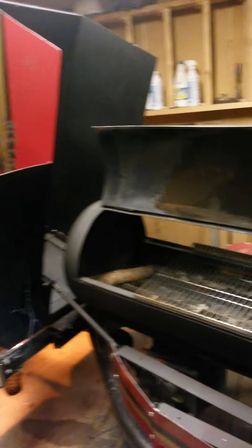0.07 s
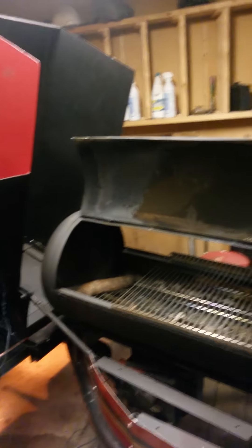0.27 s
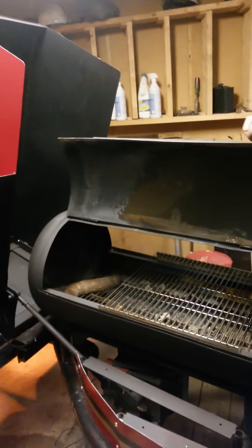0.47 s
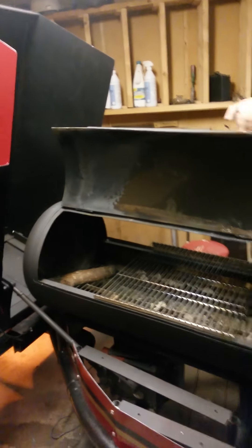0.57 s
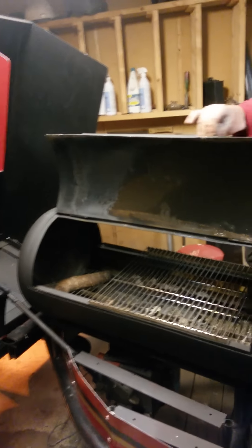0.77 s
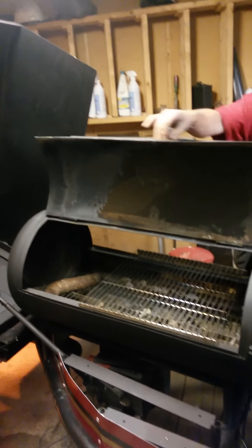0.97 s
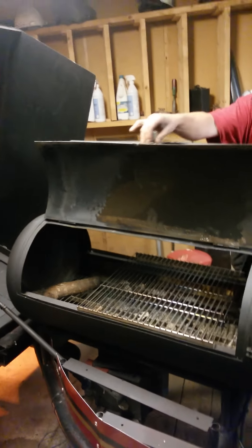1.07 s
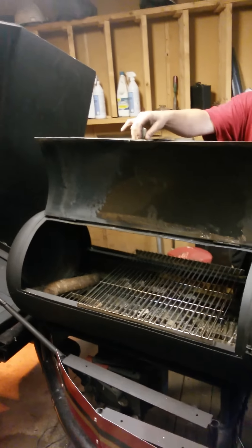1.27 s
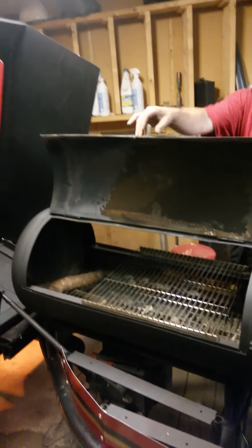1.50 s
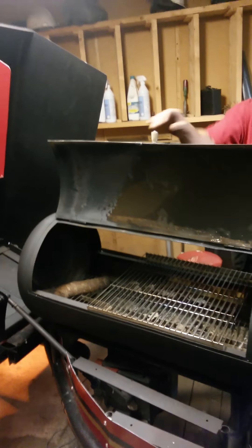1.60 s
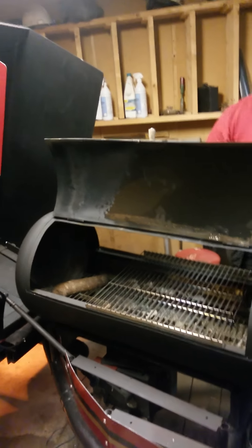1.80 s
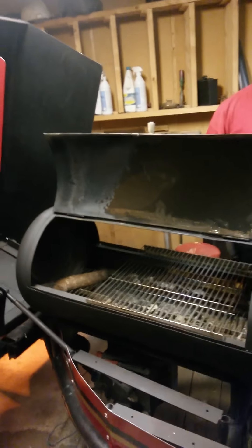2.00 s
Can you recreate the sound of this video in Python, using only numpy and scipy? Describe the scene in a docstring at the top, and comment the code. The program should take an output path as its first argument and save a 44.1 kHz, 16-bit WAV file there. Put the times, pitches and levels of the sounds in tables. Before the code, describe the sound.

Something abrasive rasps loudly over a metal barbecue barrel, three short strokes then a long one.

```python
"""Scouring a barrel barbecue

A hand rubs something abrasive over sheet steel in a workshop: three short strokes, then a long one.
Dense grit catches and slips, ringing the panels and the barrel, with a brief squeal here and there.
The room carries the ring away over a faint hum. The left is dull above 6 kHz, the right is bright."""
import sys
import numpy as np
from scipy import signal
from scipy.fft import rfft, irfft
from scipy.io import wavfile

SR = 44100
rng = np.random.default_rng(int(sys.argv[2]) if len(sys.argv) > 2 else 0)


def unload_audio(sound):
    """Save the sound as a 16-bit wav file, at the path given as the first command line argument."""
    columns = np.transpose(np.atleast_2d(sound))
    # keep every value between -1 and 1, then stretch to whole-number steps
    steps = np.round(np.clip(columns, -1, 1) * 32767)
    wavfile.write(sys.argv[1], SR, steps.astype(np.int16))


N = 90404
T = np.arange(N) / SR
HZ = np.arange(N // 2 + 1) * SR / N + 1e-3
ALIKE_HZ = 740  # below this both microphones hear nearly the same


def undb(db):
    """Decibels to gain."""
    return np.exp(np.asarray(db) * (np.log(10) / 20))


def unit(x):
    """Scale to rms 1."""
    return x / np.sqrt(np.mean(x ** 2))


def walk(rate):
    """A random wobble with a spread near 1, gliding to a new value `rate` times a second."""
    steps = rng.standard_normal(1024)
    return 1.2 * np.interp(T * rate, np.arange(len(steps)), steps)


def fade(t60):
    """Exponential decay of unit energy, falling 60 dB in t60 seconds."""
    return unit(np.exp(-np.log(1000) * T / t60)) / np.sqrt(N)


def swell(at, half_width):
    """Bell-shaped rise and fall around a moment."""
    return np.exp(-.5 * ((T - at) / half_width) ** 2)


def pair(x):
    """Blend two unrelated sounds into stereo: narrow in the bass, wide in the treble."""
    alike = .92 / (1 + (HZ / ALIKE_HZ) ** 4)
    mid, side = rfft(x)
    mid, side = mid * np.sqrt(1 + alike), side * np.sqrt(1 - alike)
    return unit(irfft(np.array([mid + side, mid - side]), N))


def diffuse():
    """Stereo noise from all around."""
    return pair(rng.standard_normal((2, N)))


def convolve(x, response):
    """Pass a sound through an impulse response for each microphone."""
    return signal.fftconvolve(np.atleast_2d(x), response, axes=1)[:, :N]


def colour(x, curve):
    """Stereo EQ of unit power, drawn through points of frequency, left dB and right dB."""
    hz, *sides = np.array(curve, float).T
    gain = undb([np.interp(np.log(HZ), np.log(hz), db) for db in sides])
    cepstrum = irfft(np.log(gain), N)
    cepstrum[:, 1:N // 2] *= 2  # fold to minimum phase, so nothing rings ahead of an attack
    cepstrum[:, N // 2:] = 0
    response = irfft(np.exp(rfft(cepstrum)), N)
    return convolve(x, unit(response) / np.sqrt(N))


def hum():
    """The steady hum and whine of the workshop, as narrow bands of noise."""
    # Each row: centre in Hz, width in Hz, level in dB.
    hum_bands = [(56, 14, -63), (101, 4, -67), (135, 4, -64), (242, 4, -69), (400, 30, -72), (657, 30, -70),
                 (1077, 8, -72), (1244, 10, -75), (1825, 60, -67), (3106, 10, -76), (3720, 90, -77)]
    power = 0
    for hz, width, db in hum_bands:
        band = 1 / (1 + (2 * (HZ - hz) / width) ** 2) ** 2
        power = power + undb(db) ** 2 * band / band.mean()
    return irfft(rfft(rng.standard_normal(N)) * np.sqrt(power), N)


def workshop():
    """Room tone: background air, a faint machine hum and a few soft, low thumps."""
    # Each row: frequency in Hz, left and right EQ of the air in dB.
    air_eq = [(25, -24, -42), (55, 2, 8), (136, -1.5, 3.5), (302, -11, -10.5), (664, -7, -1),
              (1430, -14, -14), (1850, 0.5, -7), (2240, -13, -10), (3830, -8.5, -15), (5570, -13, -17),
              (7900, -19.5, -22.5), (10700, -23, -9), (14600, -21, -21)]
    # Each row: start in seconds, decay time in seconds, pitch in Hz, level in dB.
    thumps = [(.01, 0.027, 60, -46), (.07, .035, 59.4, -45), (1.085, .02, 58, -52), (1.18, 0.023, 58, -50),
              (1.42, 0.16, 55.7, -47), (1.565, .02, 62, -47), (1.685, 0.03, 61, -41)]
    bed = undb(-53) * colour(diffuse(), air_eq) + hum()
    for start, decay, hz, db in thumps:
        age = np.maximum(T - start, 0)
        bed += undb(db) * np.sin(2 * np.pi * hz * age) * np.exp(-age / decay)
    return bed


def wash(force):
    """Near reflections, then the diffuse tail of the crowded panel modes and the room together."""
    # Each row: band centre in Hz, time to fall 60 dB in seconds, relative level in dB.
    tail_bands = [(100, 0.7, -9), (300, 0.74, 0.5), (900, 1, -17.5), (2000, 0.66, -5.5), (5000, 0.25, -7),
                  (10000, 0.1, -1.5), (16000, 0.16, -4.5)]
    early_db, tail_db = -7, -0.5
    response = undb(early_db) * diffuse() * fade(t60=0.054)
    noise = rfft(diffuse())
    centres = np.log([row[0] for row in tail_bands])
    for share, (_, t60, db) in zip(np.eye(len(tail_bands)), tail_bands):
        band = np.interp(np.log(HZ), centres, share)  # crossfades into its neighbours
        response += undb(tail_db + db) * irfft(noise * band, N) * fade(t60)
    return convolve(force, response)


def squeals():
    """Brief wavering tones where the rubbing locks onto a mode, a little to the right."""
    # Each row: peak time in seconds, half-width in seconds, pitch in Hz, level before panning in dB.
    locks = [(0.11, 0.046, 523, -50), (0.22, .03, 529, -41.5), (.39, 0.013, 530, -34.5),
             (0.393, .022, 589.6, -33.5), (0.55, 0.008, 1897, -26.5), (0.653, 0.013, 726, -28.5),
             (0.662, 0.007, 1734, -27), (.83, 0.035, 1895, -32), (0.913, 0.022, 245, -40),
             (.92, 0.13, 134, -52), (1.587, 0.1, 240, -52.5)]
    waver, right_lead_db = 0.00873, 4.5
    tones = np.zeros(N)
    for at, half_width, hz, db in locks:
        pitch = hz * (1 + waver * walk(rate=58.9))
        tone = np.sqrt(2) * np.sin(2 * np.pi * np.cumsum(pitch) / SR)
        tones += undb(db) * tone * swell(at, half_width)
    return tones * undb([[-right_lead_db / 2], [right_lead_db / 2]])


def barbecue(force):
    """Single modes of the steel ring out, each fed now more, now less by the moving contact."""
    # Each row: pitch in Hz, time to fall 60 dB in seconds, left and right relative level in dB.
    modes = [(135, .8, -24, -22), (215, .6, -24, -22), (242, .8, -27, -25), (300, .6, -25, -23),
             (335, .6, -25, -23), (408, .55, -20, -23), (523, .4, -17, -16), (560, .3, -30, -25),
             (595, .35, -32, -23), (685, .3, -28, -26), (764, .5, -24, -27), (923, .5, -22, -23),
             (948, .4, -32, -23), (1060, .6, -27, -22), (1079, .6, -25, -26), (1170, .4, -24, -28),
             (1255, .35, -24, -22), (1352, .45, -23, -28), (1410, .2, -24, -25), (1575, .2, -25, -24),
             (1230, .06, -23, -23), (1870, .05, -22, -22), (2095, .05, -23, -23), (3460, .05, -23, -23),
             (1790, .3, -25, -24), (1895, .3, -22, -24), (2078, .25, -23, -23), (2120, .25, -23, -23),
             (2470, .3, -26, -25), (3676, .25, -26, -29), (4052, .25, -25, -26), (4735, .12, -23, -23),
             (4892, .22, -26, -31), (5044, .22, -23, -27), (5370, .07, -21, -29), (6420, .15, -25, -23),
             (11000, .06, -24, -17), (11975, .2, -28, -21)]
    # As the contact travels along the lid, some modes gain and others lose.
    # Each row: frequency in Hz, change of drive in dB per second.
    drift = [(135, 10), (330, 0.5), (523, -6.5), (760, -0.5), (930, 0.5), (1400, 3.5), (1900, -8.5),
             (3700, 3.5), (5000, 4.5)]
    drive_db, wander_db, midway_s = -4, 2.5, 0.74
    steel = np.zeros((2, N))
    for hz, t60, left_db, right_db in modes:
        travel_db = np.interp(hz, *np.array(drift).T) * (T - midway_s)
        drive = force * undb(drive_db + travel_db + wander_db * walk(rate=18.27))
        pole = np.exp((2j * np.pi * hz - np.log(1000) / t60) / SR)
        ring = signal.lfilter([np.sqrt(2 * (1 - abs(pole) ** 2))], [1, -pole], drive)
        # Higher modes can reach the two sides further out of phase.
        phase = rng.uniform(-np.pi, np.pi) * min(hz / (4 * ALIKE_HZ), 1)
        steel += [undb(left_db) * ring.imag, undb(right_db) * (ring * np.exp(1j * phase)).imag]
    return steel


def grit():
    """Tiny slips of uneven size all over the contact, bunched by the chatter of the hand."""
    slips_per_s, size_spread_db, chatter_db = 10000, 3, 0.54
    catches = rng.random((2, N)) < slips_per_s / SR / 2  # shared between two streams
    slips = catches * rng.choice([-1, 1], (2, N))
    size = undb(size_spread_db * np.minimum(rng.exponential(size=(2, N)), 5))
    return pair(slips * size * undb(chatter_db * walk(rate=328)))


def rubbing():
    """The grit follows the pressure of the hand, which lifts off and brushes the steel as it leaves."""
    # Each row: time in seconds, then the relative levels of the mid rasp, lows and treble in dB.
    strokes = [(0.0, -18, -7, -12), (0.077, -10.5, -2, -7.5), (0.108, -15, -6, -17.5),
               (0.193, -21.5, -16, -17), (0.208, -11, -5, -4), (0.245, -9, -12, -9), (0.285, -12, -33, -14),
               (0.3, -13.5, 0.5, -10), (0.354, -2, -1, 4), (0.398, 0, 4.5, -3.5), (0.45, -8, 0, -5),
               (0.519, -7.5, 0, -10.5), (0.552, 2, 1.5, 4), (0.575, 0.5, 1, -3), (0.618, 1, 0, 7.5),
               (0.67, 4, 0, -0.5), (0.7, 1, 7.5, 1.5), (0.78, 2.5, -2.5, 3.5), (0.825, 6, 6, 6.5),
               (0.88, 2.5, 3.5, 7), (0.93, 2, 2.5, 7), (0.994, 3, -2, 9), (1.02, 3.5, -2.5, -0.5),
               (1.084, -2.5, 6, 2.5), (1.114, 1, -12.5, 5.5), (1.27, 2.5, 0, 1.5), (1.349, -6, 0, -7.5),
               (1.42, -16.5, -8, -19.5)]
    # Each row: peak time in seconds, half-width in seconds, upper edge in Hz, relative level in dB.
    light_touches = [(1.574, 0.031, 14600, -53.5), (1.668, 0.029, 730, -32)]
    rasp_db, low_db, treble_db = -16, -19.5, -16.5
    radiate_hz, low_edge_hz, treble_edge_hz = 86, 1240, 5300
    lift_s, lift_db_per_s = 1.401, 128.5
    spectrum = rfft(grit()) / (1 + (radiate_hz / HZ) ** 2)  # the panel radiates little deep bass
    low = 1 / (1 + (HZ / low_edge_hz) ** 10)
    treble = 1 - 1 / (1 + (HZ / treble_edge_hz) ** 6)
    rasp = 1 - low - treble
    times, *curves = np.array(strokes).T
    force = np.zeros((2, N))
    for band, curve, db in zip((rasp, low, treble), curves, (rasp_db, low_db, treble_db)):
        force += irfft(spectrum * band, N) * undb(np.interp(T, times, curve) + db)
    force *= undb(-lift_db_per_s * np.maximum(T - lift_s, 0))
    for at, half_width, edge_hz, db in light_touches:
        brush = irfft(spectrum / (1 + (HZ / edge_hz) ** 4), N)
        force += undb(db) * brush * swell(at, half_width)
    return force


def scene():
    """The direct scrape, its wash and the ringing steel, with squeals on top and room tone beneath."""
    # The scrape's tone at the microphones. Each row: frequency in Hz, left and right EQ in dB.
    scrape_eq = [(98, -26, -27.5), (196, -26, -23), (324, -23, -21), (475, -13, -20), (532.5, -10.5, -7),
                 (756, -14.5, -6), (860, -25, -5), (1014, -7, -6.5), (1264, -6, -4.5), (1630, -9.5, -11.5),
                 (1975, -6.5, -6.5), (2590, -7.5, -8.5), (2750, -5, -4), (3550, -0.5, -4.5),
                 (4390, -3.5, -9), (5210, 3.5, -7), (5890, -5.5, -10.5), (7000, -11.5, -10.5),
                 (8400, -26.5, -13), (10000, -31, -10.5), (11200, -40, -8.5), (13440, -29.5, -19),
                 (14800, -55, -24.5)]
    force = rubbing()
    mono_force = force.sum(axis=0) / np.sqrt(2)
    steel = undb(-7.5) * force + wash(force) + barbecue(mono_force)
    return colour(steel, scrape_eq) + squeals() + workshop()


def record(dry):
    """A soft clip rounds the highest peaks and a steep low-pass cuts the top."""
    ceiling, top_hz = .95, 15500
    rounded = dry / (1 + (dry / ceiling) ** 6) ** (1 / 6)
    return signal.sosfilt(signal.ellip(10, .2, 80, top_hz, fs=SR, output="sos"), rounded)


dry = scene()
out = record(dry)
unload_audio(out)
```